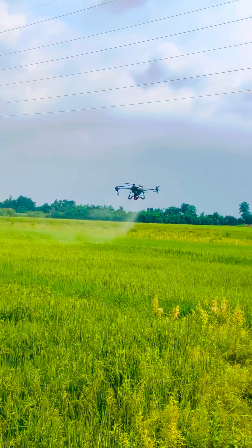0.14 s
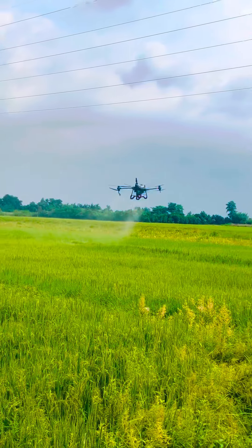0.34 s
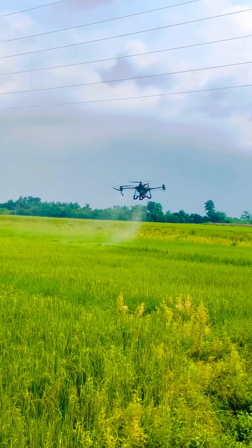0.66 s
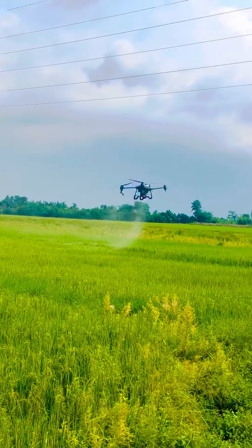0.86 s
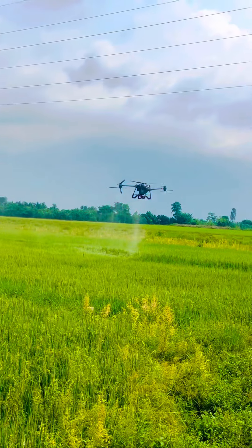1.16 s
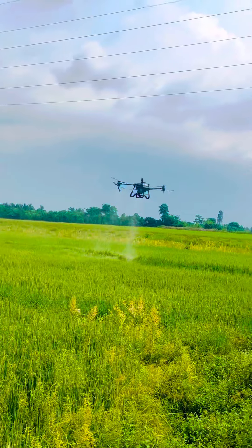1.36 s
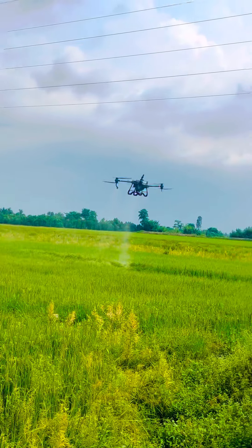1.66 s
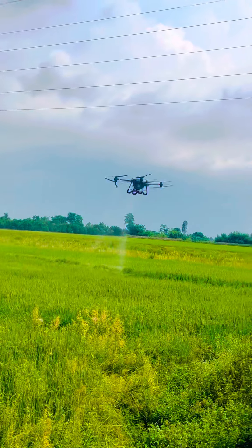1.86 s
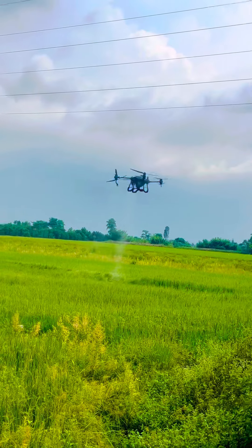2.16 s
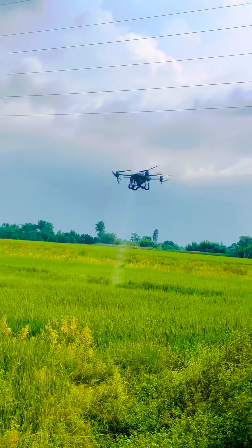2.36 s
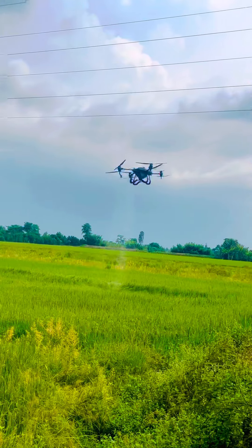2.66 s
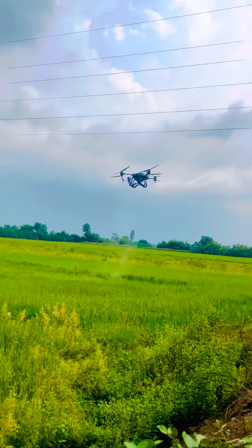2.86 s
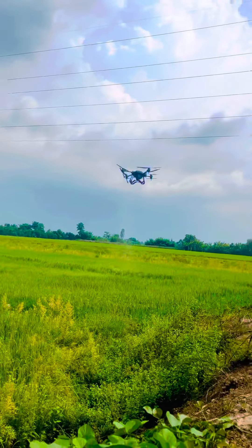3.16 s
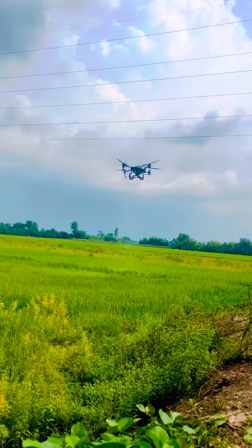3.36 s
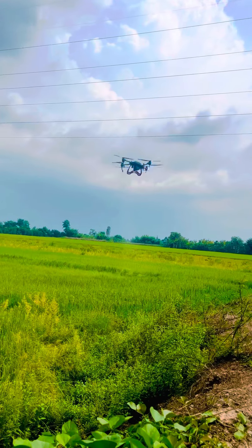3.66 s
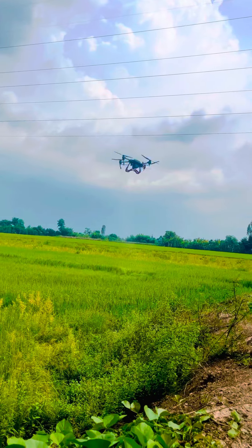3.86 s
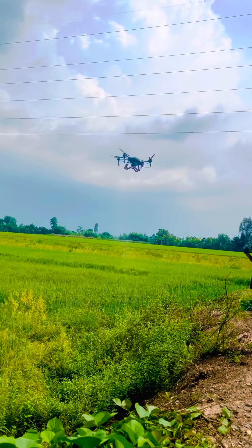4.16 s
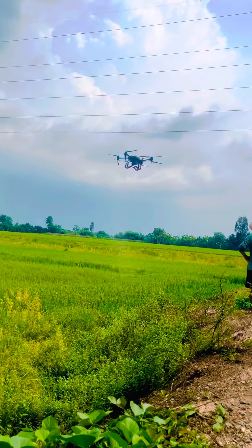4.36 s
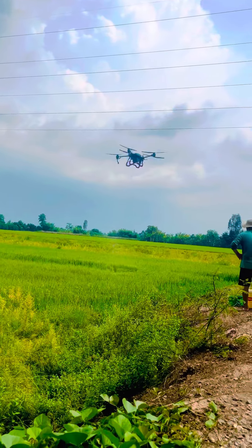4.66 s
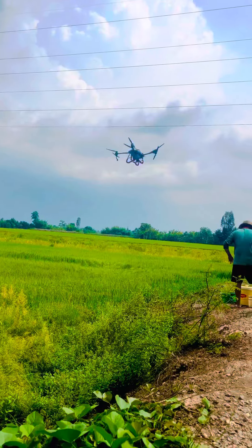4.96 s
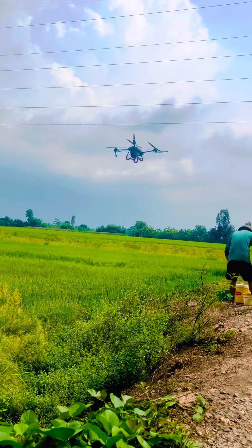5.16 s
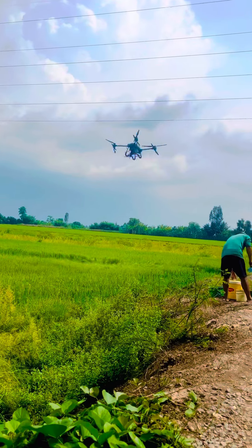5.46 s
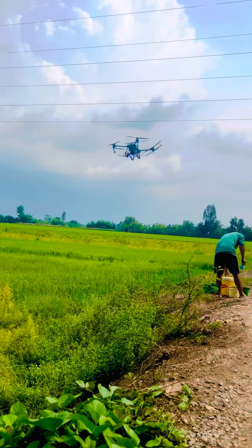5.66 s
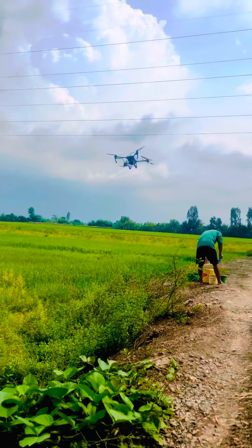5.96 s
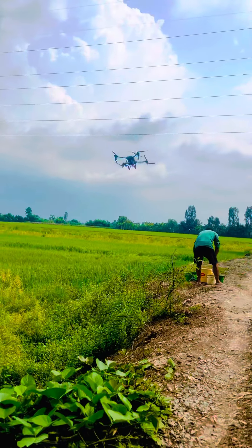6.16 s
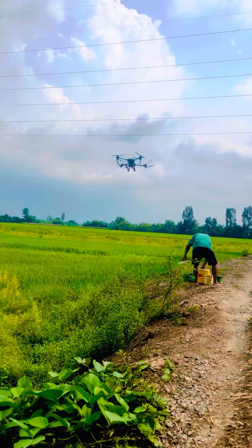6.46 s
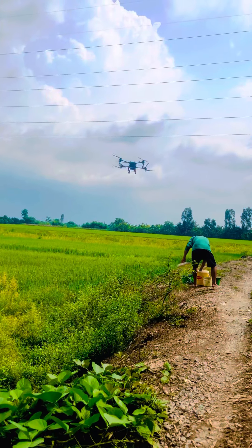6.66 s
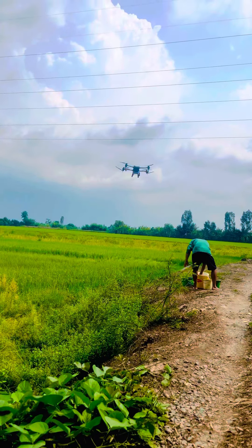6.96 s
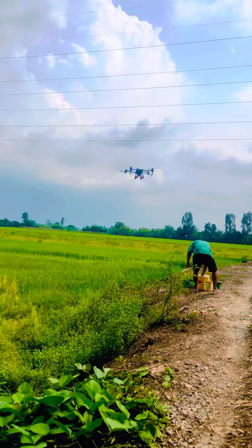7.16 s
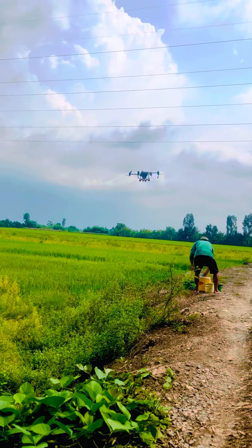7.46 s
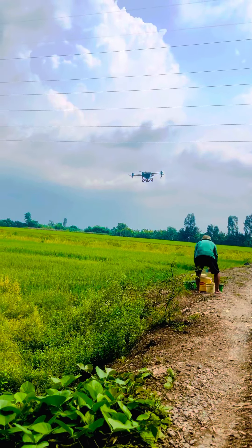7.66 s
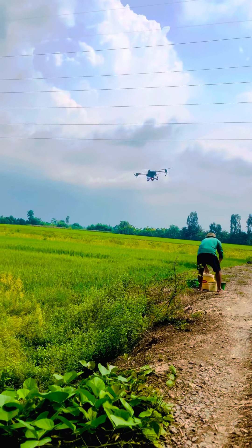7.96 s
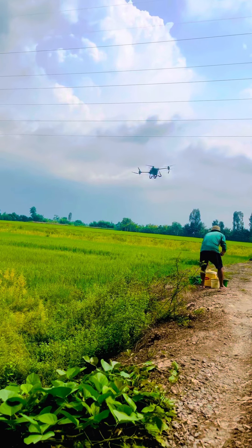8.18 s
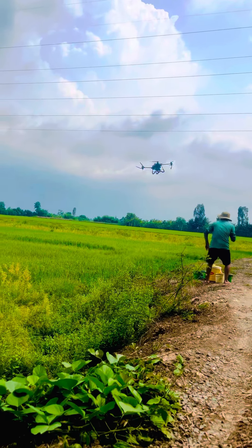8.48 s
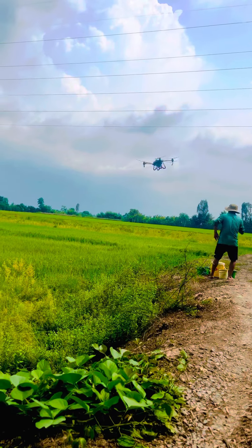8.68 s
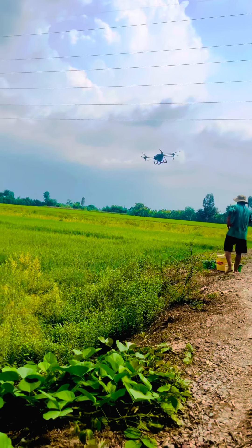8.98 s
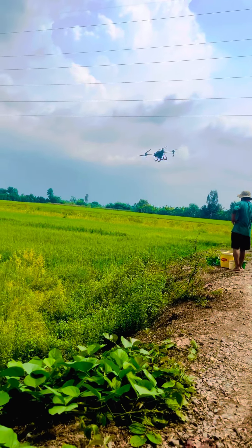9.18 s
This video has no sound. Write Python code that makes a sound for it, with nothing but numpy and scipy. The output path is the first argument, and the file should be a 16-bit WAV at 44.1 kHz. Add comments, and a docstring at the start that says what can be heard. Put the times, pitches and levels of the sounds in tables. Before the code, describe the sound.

Open farmland, recorded in stereo from a field edge. From the start a large four-rotor drone gives a low harmonic buzz and broad airy rush, chopped by its blades. Between 0.5 and 1.5 seconds the rotors speed up and the rush swells, with bright, short hiss flashes; then pitch and roar fall back into a fluttering hover by 2 seconds. Around 4.5 to 6 seconds it swells again with more hollow roar and spitting flashes, before the treble softens near 7.4 and partly returns. Throughout, a distant single-cylinder engine thuds firmly, about nine beats a second, with quick echoes and a faint metallic ring, over low hum and soft rumble. Faint high chirps accompany some beats, clearest near 3.5 and 5.2. Tiny dry crackles come at 3.3, then softer scuffs at 6.9, 7.4, 8.3 and 9.2. The drone and engine continue to the end.

```python
"""Spraying drone over a rice field

A large drone brakes, turns and hovers low. Its four rotors are sums of blade harmonics plus bands of noise
that the blades chop; short bright flashes of hiss and shifting ground echoes are added.
Far off a slow single-cylinder engine, likely a water pump, thuds about nine times a second: swept tone bursts
with echoes and a ring. Faint chirps of narrow noise ride on some beats, over a low hum and a soft rumble.
Now and then something dry crackles faintly close by, as short bursts of noise."""
import sys
import numpy as np
from scipy import signal
from scipy.fft import rfft, irfft
from scipy.io import wavfile

SR = 44100
rng = np.random.default_rng(int(sys.argv[2]) if len(sys.argv) > 2 else 0)


def generate_wav(sig):
    """Save sig (samples, or channels by samples) to the path in sys.argv[1] as 16-bit PCM at SR."""
    pcm = np.round(np.clip(np.atleast_2d(sig).T, -1, 1) * 32767).astype(np.int16)
    wavfile.write(sys.argv[1], SR, pcm)


N = 411012
T = np.arange(N) / SR  # time of every sample, s
HZ = np.maximum(np.fft.rfftfreq(N, 1 / SR), 1)  # frequency of every spectrum bin, Hz

# phase by which the left microphone leads the right: [f/Hz, phase/rad]
MIC_LEAD = [(0, 0), (300, 0), (550, -.4), (1000, -.15), (1300, -.4), (1900, 0), (2400, 1.7), (2900, 2.1),
            (3600, .4), (4800, 0), (5400, 2.4), (6000, 3.14), (7900, 6.28), (10200, 9.42), (12350, 12.57),
            (14700, 15.7), (16000, 17.6)]
# how alike left and right are: [f/Hz, likeness 0-1]
MIC_LIKENESS = [(60, 1), (200, 0.97), (400, 0.6), (900, 0.91), (1700, 0.89), (2400, 0.75), (3500, 0.45),
                (4800, 0.17), (6000, 1), (8000, 1), (15000, 1)]

# colour of the open-air rumble: [f/Hz, relative level/dB]
RUMBLE_COLOUR = [(20, -42), (30, -22), (48, -2), (80, 0), (150, -1.5), (250, -14), (500, -23), (1500, -43)]

# basic level of the low hum: [t/s, level/dB]
HUM_LEVEL_CURVE = [(0, -33.5), (.6, -38.5), (1.5, -34.5), (2.8, -37), (3.6, -38.5), (5.2, -37), (6.1, -49),
                   (6.8, -39), (7.4, -40.5), (8.2, -45), (9.32, -39.5)]
HUM_START_HZ, HUM_RISE_HZ_PER_S = 68.7, .5
HUM_WAVER_DB, HUM_FLUTTER_DB = 1.2, 1.4  # spread of the slower and the faster changes of level

# the engine's governor hunts a little: [t/s, time to the next beat/s]
BEAT_SPACING = [(0, .1097), (.6, .10921), (2, .10925), (2.5, .10898), (3.3, .10938), (4.9, .10897),
                (5.8, .10849), (6.6, .10906), (7.6, .10919), (9.32, .10934)]
# echoes of every beat from dykes and trees: [delay/s, level relative to the beat/dB]
BEAT_ECHOES = [(0.0166, -20), (0.033, -26), (.0432, -19), (0.062, -19.5), (.0865, -17), (0.093, -23.5)]
# change in level of the silencer's ring: [t/s, relative level/dB]
RING_TREND = [(0, -5), (2.5, -4.5), (3.3, -1.5), (5, -2.5), (7, -1), (9.32, -1)]
FIRST_BEAT_S = .0297

# the clearest chirps, in step with the thuds: [t/s, level before the common gain/dB, f/Hz]
CLEAR_CHIRPS = [(3.416, -48, 4600), (3.634, -48, 4700), (3.744, -46, 4600), (5.165, -49, 4410)]
# weak chirps on the later beats: starting level before the common gain, its spread, its fade, middle pitch
WEAK_CHIRP_DB, CHIRP_SPREAD_DB, CHIRP_FADE_DB_PER_S, WEAK_CHIRP_HZ = -54, 2, 0.6, 4600
CHIRP_HALF_WIDTH_HZ = 100

# crackles and scuffs, as of dry grass and grit underfoot: [t/s, level/dB, decay/s, centre f/Hz]
DRY_CRACKLES = [(3.284, -41, .003, 2400), (3.336, -32.5, 0.0024, 2570), (6.89, -46, 0.013, 4000),
                (7.425, -43, 0.021, 3745), (8.295, -43, 0.033, 3954), (9.185, -44, 0.017, 3880)]
CRACKLE_RISE, CRACKLE_WIDTH = .25, 1.27  # rise as a share of the decay; ratio of band edge to centre

# basic speed of the front and the rear rotors: [t/s, blade passes per s]
FRONT_SPEED = [(0, 34), (.2, 34), (.55, 42), (1, 49), (1.3, 47), (1.75, 38.3), (3.2, 38.2), (3.5, 34.5),
               (3.8, 35), (4.5, 39.5), (5.4, 36.8), (6.1, 38.5), (7.3, 38), (7.6, 41.5), (8.4, 38.7),
               (9.32, 38.5)]
REAR_SPEED = [(0, 38.13), (.5, 36.16), (.75, 36.36), (1.25, 42.19), (2, 37.37), (3.2, 38.07), (3.7, 35.96),
              (4, 38.5), (4.5, 40.84), (5, 39.5), (5.45, 37.71), (5.85, 38.04), (6.3, 41.77), (6.65, 38.18),
              (7, 39.2), (7.7, 40.32), (8.3, 37.75), (9.32, 37.18)]
# strength of a blade harmonic by its pitch: [f/Hz, relative level/dB]
BLADE_TONE_COLOUR = [(36, -18), (55, -14), (80, 8.5), (115, -7.5), (145, 2.5), (190, 2.5), (220, -5),
                     (250, -4.5), (285, -2.5), (330, -7.5), (400, -12), (600, -15), (900, -17), (1200, -17)]
# balance of the two lowest blade harmonics: [t/s, relative level/dB]
GROWL_TREND = [(0, 4), (.5, 2.5), (.9, 1), (1.2, 6.5), (1.65, 7), (2.3, 2), (3, 4), (4.5, -3), (5.6, -1),
               (6.4, -4), (7.7, 2), (9.32, -4)]
# balance of the blade harmonics above the second: [t/s, relative level/dB]
BUZZ_TREND = [(0, -1), (.9, 0), (1.7, -1), (2.6, -2), (3.5, 0), (4.5, 3), (5.3, 1.5), (6.3, 0.5),
              (7.3, 2.5), (8.2, 2.5), (9.32, 1)]
JOSTLE_RAD = .06  # spread of the push by which gusts move a blade out of step

# colours of the rotor noise, from low to high: [f/Hz, relative level/dB]
DOWNWASH_COLOUR = [(20, -38), (35, -8), (50, 6), (80, 7), (150, 7), (195, 8.5), (245, -1), (330, -2.5),
                   (420, -6), (650, -13), (850, -38)]
ROAR_COLOUR = [(290, -13), (390, 1), (470, 1), (570, -2.5), (660, -14.5), (780, -35)]  # hollow roar of the inflow
WAKE_COLOUR = [(480, -24), (680, 2), (850, 0.5), (1200, -3), (1700, -3.5), (2150, -3), (2800, -53)]
SWISH_COLOUR = [(1700, -62), (2250, -2), (2500, 1.5), (2720, 1.5), (2950, 1), (3450, -2.5), (4300, -2.5),
                (4700, -3.5), (5700, -9), (7200, -83)]
HISS_COLOUR = [(4600, -108), (6100, 4.5), (7800, 5), (10000, 2.5), (12000, 1), (15800, -19)]
SIZZLE_COLOUR = [(8000, -33), (11000, -4), (13000, 8.5), (14400, 6.5), (15800, -3)]

# swing of the rotors' rush as the drone nears and turns: [t/s, relative level/dB]
RUSH_SWING = [(0.0, 0.7), (0.8, 5), (1.3, 3.5), (1.9, -0.7), (2.7, -0.3), (3.8, -2), (5.3, 1.5), (6.4, 1),
              (7.3, -2.14), (9.32, -1.4)]
# slow trend of the low downwash: [t/s, relative level/dB]
DOWNWASH_TREND = [(0, -0.5), (1.1, 1), (2.3, -5.5), (3.5, -2), (4.5, 1.5), (6.3, .5), (7.3, 0), (9.32, 2)]
# inflow roar, beamed at the listener as the drone tilts; before effort and chop: [t/s, level/dB]
ROAR_CURVE = [(0, -45), (.9, -44), (1.299, -44.5), (1.8, -53.5), (2.6, -52), (3.4, -53), (4.5, -46.5),
              (5.3, -47), (7.2, -54.5), (9.32, -56.5)]
# slow trend of the swish: [t/s, relative level/dB]
SWISH_CURVE = [(0.0, -3), (1.7, -2.1), (3.3, 1.57), (9.32, 0)]
# swing of the tip hiss and sizzle: [t/s, relative level/dB]
TREBLE_SWING = [(0.0, 0), (1.0, 1), (2.299, 1.5), (3.8, 0.5), (5.6, 1.5), (6.4, -1), (7.4, -5), (8.4, -2),
                (9.32, -1.8)]

# basic level of each layer (dB) and the share of the rush's swing that it follows
TONES_DB, TONES_FOLLOW = -37.5, 1.74
WASH_DB, WASH_FOLLOWS = -44.3, 1.22
WAKE_DB, WAKE_FOLLOWS = -46, 0.89
SWISH_DB, SWISH_FOLLOWS = -43.5, 0.69
# the tip noise follows the treble's swing instead, the hiss in full
HISS_DB, SIZZLE_DB, SIZZLE_FOLLOWS = -44.5, -49, 1.6
# rotor sound grows as a power of the speed relative to hovering
HOVER_PER_S, EFFORT_POWER, SIZZLE_POWER = 38.4, 0.51, 3.4  # first one in blade passes per s
# depth of the chop (0-1) when hovering, the extra in a manoeuvre,
# and the change of speed that brings it on (blade passes per s)
CHOP_HOVER, CHOP_EXTRA, MANOEUVRE_PER_S = 0.47, 0.26, 5.5
# share of the chop made by the rotor tilted toward the listener: when hovering, and the extra
LEAD_SHARE, LEAD_EXTRA = .48, .3

# a tilted rotor beams a flash of hiss at the listener once a turn:
# [first flash t/s, last flash t/s, middle level/dB]
FLASH_TIMES = [(.683, .683, -30), (1.023, 1.27, -33.5), (1.629, 1.98, -33.5), (2.085, 2.293, -35),
               (2.5, 2.92, -38.5), (3.495, 3.902, -35), (4.875, 5.032, -35.5), (5.487, 5.861, -33.5),
               (6.836, 7.243, -39), (7.608, 7.85, -37.5), (8.448, 8.552, -39.5), (8.963, 9.066, -37)]
# colour of every flash: [f/Hz, relative level/dB]
FLASH_COLOUR = [(4800, -28), (6200, -10), (8000, -1.5), (11000, -1), (13000, 1.5), (14400, 4), (15800, -7)]
FLASH_RISE_S, FLASH_FALL_S, FLASH_SPREAD_DB = .0006, .0028, 1.8

# echoes off the flooded field and the near bank: [t/s, spacing of the notches/Hz, strength 0-1]
FIELD_PATH = [(0, 483, 0.37), (.9, 470, 0.57), (1.4, 437, 0.48), (2, 396.3, 0.37), (2.8, 370, 0)]
BANK_PATH = [(0, 726, 0), (3.3, 763, 0.22), (9.32, 855, 0.18)]
# an echo at a grazing angle comes back inverted: [t/s, spacing of the notches/Hz, signed strength]
GRAZING_PATH = [(0, 730, -0.09), (1.2, 670, -0.041), (2, 504, -0.13), (4, 555, -0.036), (6, 655, -0.16),
                (9.32, 726, -.16)]

CUTOFF_HZ = 15850


def from_db(db):
    """Turn decibels into a gain."""
    return 10 ** (np.asarray(db) / 20)


def rms_one(x):
    """Scale a sound to unit power."""
    return x / np.sqrt(np.mean(x ** 2))


def in_time(rows):
    """Read each column of a time curve at every sample."""
    s, *columns = np.transpose(rows)
    return [np.interp(T, s, column) for column in columns]


def at_hz(points, hz):
    """Read a spectrum on a log-frequency axis."""
    f, value = np.transpose(points)
    return np.interp(np.log(hz), np.log(f), value)


def drift(rate):
    """Smooth random curve of spread 1; a higher rate (Hz) makes it change faster."""
    # low-passed noise, made only once every 100 samples
    r = np.exp(-200 * np.pi * rate / SR)
    noise = rng.standard_normal(N // 100 + 2002)
    slow = signal.lfilter([1], [1, -2 * r, r * r], noise)[2000:]
    return np.interp(np.arange(N) / 100, np.arange(len(slow)), rms_one(slow))


def band_filter(order, low_hz, high_hz):
    """A filter that passes only the band between two frequencies."""
    return signal.butter(order, [low_hz, high_hz], "band", fs=SR, output="sos")


def air_noise(spectrum):
    """Coloured noise at two microphone ports, partly alike and shifted in phase; rms 1."""
    mid, side = rfft(rng.standard_normal((2, N)))
    alike = np.clip(at_hz(MIC_LIKENESS, HZ), 0, .999)
    sign = np.array([[1], [-1]])  # left, right
    lead = np.exp(.5j * sign * np.interp(HZ, *np.transpose(MIC_LEAD)))
    pair = (np.sqrt(1 + alike) * mid + sign * np.sqrt(1 - alike) * side) * lead
    return rms_one(irfft(pair * from_db(at_hz(spectrum, HZ)), N))


def open_air():
    """Low rumble shared by both ports, and a very faint breeze that is separate at each."""
    breeze = signal.sosfilt(band_filter(2, 34, 130), rng.standard_normal((2, N)))
    return from_db(-43) * air_noise(RUMBLE_COLOUR) + from_db(-69) * rms_one(breeze)


def low_hum():
    """A low sine tone that creeps up in pitch and wavers in level."""
    hz = HUM_START_HZ + HUM_RISE_HZ_PER_S * T
    level_db = in_time(HUM_LEVEL_CURVE)[0] + HUM_WAVER_DB * drift(1.3) + HUM_FLUTTER_DB * drift(5.6)
    tone = np.sqrt(2) * np.sin(2 * np.pi * np.cumsum(hz) / SR)
    return tone * from_db(level_db)


def firing_times():
    """Add up the slightly changing gaps to get the moment of every exhaust beat."""
    times = [FIRST_BEAT_S]
    while times[-1] < T[-1]:
        times.append(times[-1] + np.interp(times[-1], *np.transpose(BEAT_SPACING)))
    return np.array(times[:-1])


def thud(low_hz, high_hz, sweep_at, sweep_s, rise, fall):
    """One far exhaust beat: the bass runs ahead over the soft ground, so the pitch sweeps up."""
    t = np.arange(-SR // 20, SR // 20) / SR
    hz = low_hz + (high_hz - low_hz) / (1 + np.exp((sweep_at - t) / sweep_s))
    turns = np.cumsum(hz) / SR
    swell = 1 / (np.exp(-t / rise) + np.exp(t / fall))
    return swell * np.cos(2 * np.pi * (turns - turns[len(t) // 2]))


def engine(beat_db, uneven_db, ring_hz, ring_t60, ring_db, gas_db, echo_db):
    """Slightly uneven exhaust beats with echoes, and a faint ring of the silencer that bridges them."""
    at = np.round(firing_times() * SR).astype(int)
    firings = np.zeros(N)
    firings[at] = from_db(uneven_db * rng.standard_normal(len(at)))
    beat = thud(low_hz=109, high_hz=380, sweep_at=.00567, sweep_s=.00248, rise=.0062, fall=.00235)
    beats = from_db(beat_db) * signal.fftconvolve(firings, beat)[len(beat) // 2:][:N]

    # the silencer rings mostly as a tone, with a little gas rushing through it
    t = T[:SR // 2]
    fade = from_db(ring_db - 60 * t / ring_t60) * (1 - np.exp(-t / 0.016))
    ring = fade * np.sin(2 * np.pi * ring_hz * t)
    gas = signal.sosfilt(band_filter(2, ring_hz - 12, ring_hz + 20), rng.standard_normal(N))
    silencer = signal.fftconvolve(firings, ring)[:N] + from_db(gas_db) * rms_one(gas)

    echoes = sum(from_db(level_db) * np.interp(T - delay, T, beats) for delay, level_db in BEAT_ECHOES)
    # many small echoes blur into a fading tail
    scatter = rng.standard_normal(len(t)) * np.exp(-t / 0.37) * (1 - np.exp(-t / 0.0035))
    tail = rms_one(signal.fftconvolve(beats, scatter)[:N]) * beats.std() * from_db(echo_db)
    return beats + echoes + tail + silencer * from_db(in_time(RING_TREND)[0])


def weak_chirps():
    """Give each later beat a chirp of chance strength and pitch, on average slowly fading."""
    later = [s for s in firing_times() if 2.9 < s < 9.25]
    chances = rng.standard_normal((len(later), 2))
    weak = []
    for s, (force, pitch) in zip(later, chances):
        fade_db = CHIRP_FADE_DB_PER_S * (s - later[0])
        level_db = WEAK_CHIRP_DB - fade_db + CHIRP_SPREAD_DB * force
        weak.append((s, level_db, WEAK_CHIRP_HZ * np.exp(0.05 * pitch)))
    return weak


def chirps(length, gain_db):
    """Each chirp is a brief swell of narrow noise, made by moving slow noise up to the chirp's pitch."""
    out, t = np.zeros((2, N)), np.arange(-SR // 20, SR // 20) / SR
    narrow = signal.butter(2, CHIRP_HALF_WIDTH_HZ, fs=SR, output="sos")
    for s, level_db, hz in list(CLEAR_CHIRPS) + weak_chirps():
        real, imag = signal.sosfilt(narrow, rng.standard_normal((2, len(t))))
        lead = np.interp(hz, *np.transpose(MIC_LEAD)) * np.array([[1], [0]])
        tone = (rms_one(real) + 1j * rms_one(imag)) * np.exp(1j * (2 * np.pi * hz * t + lead))
        swell = np.exp(-(t / length) ** 2)
        start = round(s * SR) - len(t) // 2
        out[:, start:start + len(t)] += tone.real * swell * from_db(level_db + gain_db)
    return out


def crackles():
    """Each crackle is a burst of band noise that dies at once; the longer ones also start more softly."""
    out, t = np.zeros((2, N)), T[:SR // 8]
    for s, level_db, decay, hz in DRY_CRACKLES:
        band = band_filter(3, hz / CRACKLE_WIDTH, hz * CRACKLE_WIDTH)
        burst = rms_one(signal.sosfilt(band, rng.standard_normal((2, len(t)))))
        shape = np.exp(-t / decay) * (1 - np.exp(-t / (CRACKLE_RISE * decay)))
        start = round(s * SR)
        out[:, start:start + len(t)] += burst * shape / shape.max() * from_db(level_db)
    return out


def echo(x, path, dull_hz):
    """The ground returns the sound a little later and duller; the delay follows the drone."""
    spacing, strength = in_time(path)
    soft = signal.sosfiltfilt(signal.butter(1, dull_hz, fs=SR, output="sos"), x)
    # notches lie one over the delay apart
    return strength * np.array([np.interp(T - 1 / spacing, T, side) for side in soft])


def shimmer(x, depth_db, rate, grain_db, grain_rate, count=24):
    """Restless air makes each narrow band of the sound swell slowly and flutter quickly on its own."""
    centres, spectrum, out = np.geomspace(600, 6000, count), rfft(x), 0
    for share in np.eye(count):
        # each band fades into its neighbours
        band = irfft(spectrum * np.interp(np.log(HZ), np.log(centres), share), N)
        out = out + band * from_db(depth_db * drift(rate) + grain_db * drift(grain_rate))
    return out


def blade_flashes():
    """A tilted rotor spits short bright noise once a turn, each time with chance strength."""
    speed, gain = in_time(FRONT_SPEED)[0], np.zeros(N)
    t = np.arange(-SR // 100, SR // 40) / SR
    shape = 1 / (np.exp(-t / FLASH_RISE_S) + np.exp(t / FLASH_FALL_S))
    shape = shape / shape.max()
    for first, last, level_db in FLASH_TIMES:
        # two blade passes make one turn
        turns = round(abs(last - first) * np.interp((first + last) / 2, T, speed) / 2)
        for s in np.linspace(first, last, turns + 1):
            start = round((s + t[0]) * SR)
            flash_db = level_db + FLASH_SPREAD_DB * rng.standard_normal()
            gain[start:start + len(t)] += shape * from_db(flash_db)
    return air_noise(FLASH_COLOUR) * gain


def rotor(speed, wander, flutter_db, sharpness, count=26):
    """One rotor: its harmonic hum, and the noise swell (mean 1) as each blade swings toward the listener."""
    passes = in_time(speed)[0] * (1 + wander * drift(1.2))
    # gusts jostle the blades, which blurs the higher harmonics together
    angle = 2 * np.pi * (np.cumsum(passes) / SR + rng.random()) + JOSTLE_RAD * drift(6)
    growl, buzz = from_db(in_time(GROWL_TREND)[0]), from_db(in_time(BUZZ_TREND)[0])
    hum = np.zeros(N)
    for k in range(1, count + 1):
        # the level changes slowly, so every 100th sample is enough
        level_db = at_hz(BLADE_TONE_COLOUR, k * passes[::100]) + flutter_db * drift(4)[::100]
        level = np.interp(T, T[::100], from_db(level_db))
        tone = level * np.sin(k * angle + 2 * np.pi * rng.random())
        hum += tone * (growl if k <= 2 else buzz)
    # the two blades are not quite alike, so every other swell is stronger
    swell = np.exp(sharpness * np.cos(angle)) * (1 + 0.19 * np.cos(angle / 2))
    return rms_one(hum), swell / swell.mean()


def drone():
    """Four rotors: blade tones below, chopped turbulence above, then ground echoes and flashes."""
    speed, rush_db, treble_db = (in_time(rows)[0] for rows in (FRONT_SPEED, RUSH_SWING, TREBLE_SWING))
    low_db, roar_db, mid_db = (in_time(rows)[0] for rows in (DOWNWASH_TREND, ROAR_CURVE, SWISH_CURVE))

    lead_hum, lead_swell = rotor(FRONT_SPEED, wander=0.00287, flutter_db=2.0, sharpness=2.16)
    others = [rotor(REAR_SPEED, wander=0.004104, flutter_db=3.0, sharpness=0.44),
              rotor(FRONT_SPEED, wander=.025, flutter_db=2.5, sharpness=8.8),
              rotor(REAR_SPEED, wander=.025, flutter_db=5.0, sharpness=0.95)]
    hums, swells = zip(*others)
    hum = rms_one(lead_hum + 0.7 * hums[0] + 0.57 * (hums[1] + hums[2]))
    hum = hum * from_db(TONES_DB + TONES_FOLLOW * rush_db)

    # in a manoeuvre the chop deepens and the rotor tilted toward the listener takes it over
    manoeuvre = np.tanh(np.abs(speed - HOVER_PER_S) / MANOEUVRE_PER_S)
    lead_share = LEAD_SHARE + LEAD_EXTRA * manoeuvre
    swell = lead_share * lead_swell + (1 - lead_share) * np.mean(swells, axis=0)
    depth = CHOP_HOVER + CHOP_EXTRA * manoeuvre

    def chopped(reach):
        """Noise gain whose power follows the blades."""
        share = np.clip(depth * reach, 0, 1)
        return np.sqrt(1 - share + share * swell)

    def layer(colour, level_db, reach):
        """One band of rotor noise, chopped by the blades."""
        return air_noise(colour) * from_db(level_db) * chopped(reach)

    wash = layer(DOWNWASH_COLOUR, WASH_DB + WASH_FOLLOWS * rush_db + low_db, reach=0.22)
    roar = layer(ROAR_COLOUR, roar_db + 1.0 * drift(25), reach=0.74)
    wake = layer(WAKE_COLOUR, WAKE_DB + WAKE_FOLLOWS * rush_db, reach=0.85)
    swish = layer(SWISH_COLOUR, SWISH_DB + SWISH_FOLLOWS * rush_db + mid_db, reach=0.3)
    hiss = layer(HISS_COLOUR, HISS_DB + treble_db + 1.05 * drift(30), reach=0.89)
    # the highest hiss is beamed most narrowly, so it is chopped hardest
    sizzle_db = SIZZLE_DB + SIZZLE_FOLLOWS * treble_db + 0.72 * drift(40)
    sizzle = layer(SIZZLE_COLOUR, sizzle_db, reach=1.2)
    rush = shimmer(wake + swish, depth_db=.8, rate=1.8, grain_db=1.7, grain_rate=30)
    rush = rush * from_db(.6 * drift(90))

    effort = speed / HOVER_PER_S
    direct = (hum + wash + roar + rush + hiss) * effort ** EFFORT_POWER
    direct = direct + sizzle * effort ** SIZZLE_POWER
    ground = echo(direct, FIELD_PATH, dull_hz=2720) + echo(direct, BANK_PATH, dull_hz=2660)
    ground = ground + echo(direct, GRAZING_PATH, dull_hz=3500)
    return direct + ground + blade_flashes()


def scene():
    """Add up the open air, low hum, far engine, chirps, crackles and drone."""
    pump = engine(beat_db=-12.5, uneven_db=0.83, ring_hz=356.5, ring_t60=0.17,
                  ring_db=-33.5, gas_db=-52, echo_db=-20.5)
    background = open_air() + low_hum() + pump
    return background + chirps(length=0.025, gain_db=0.5) + crackles() + drone()


def record(dry):
    """Cut the top steeply with a low-pass filter."""
    return signal.sosfilt(signal.ellip(12, .1, 80, CUTOFF_HZ, fs=SR, output="sos"), dry)


dry = scene()
out = record(dry)
generate_wav(out)
```